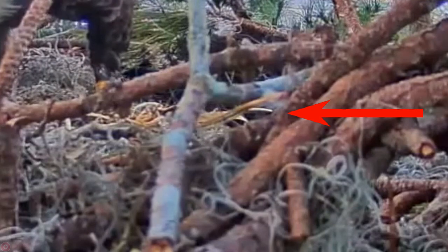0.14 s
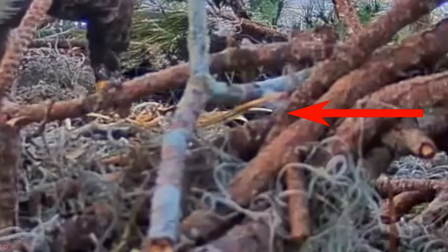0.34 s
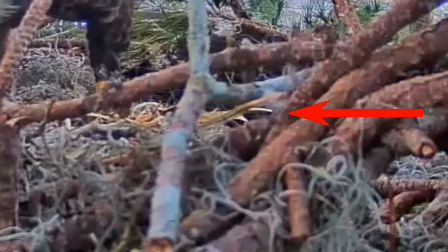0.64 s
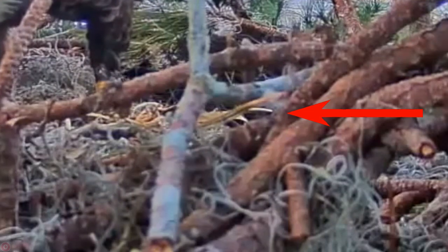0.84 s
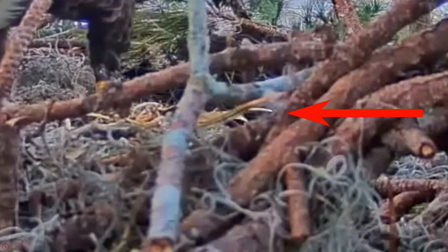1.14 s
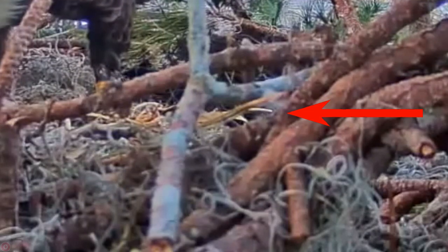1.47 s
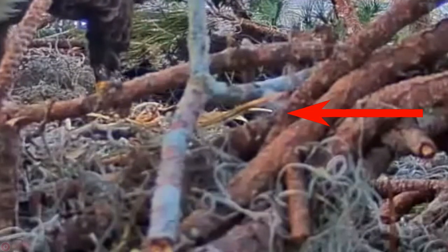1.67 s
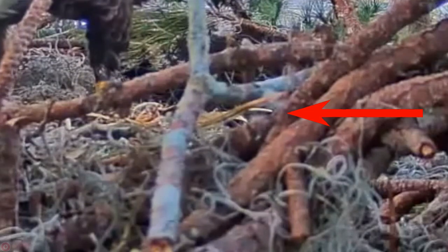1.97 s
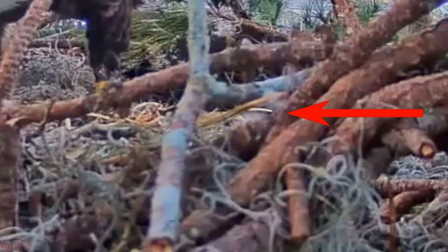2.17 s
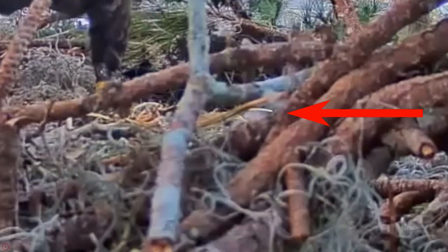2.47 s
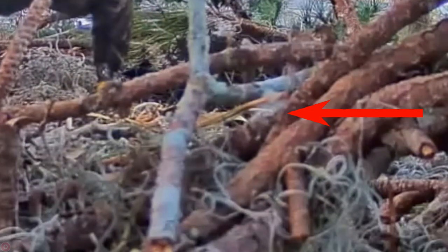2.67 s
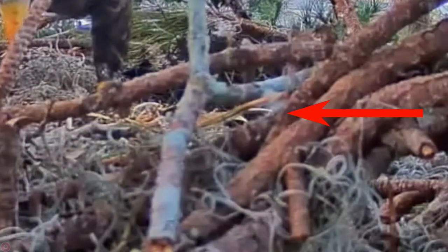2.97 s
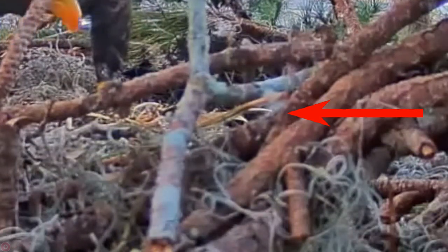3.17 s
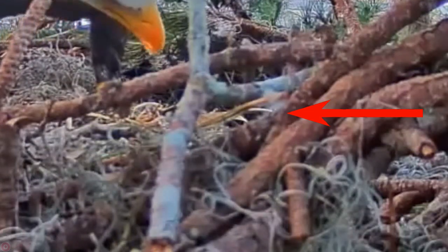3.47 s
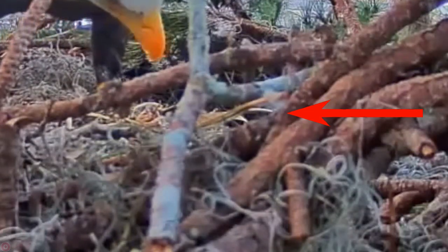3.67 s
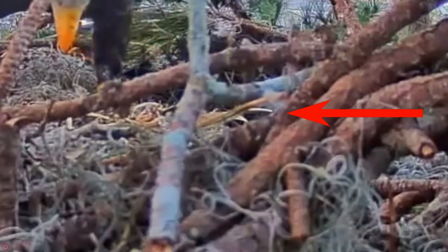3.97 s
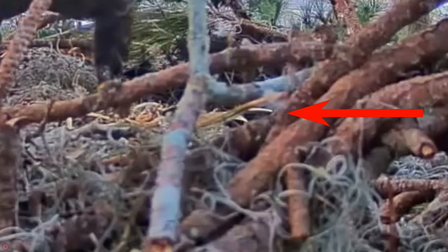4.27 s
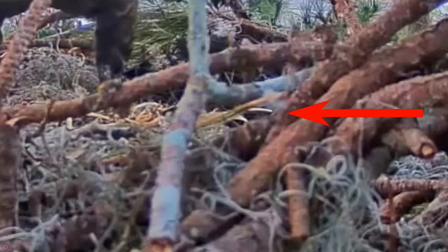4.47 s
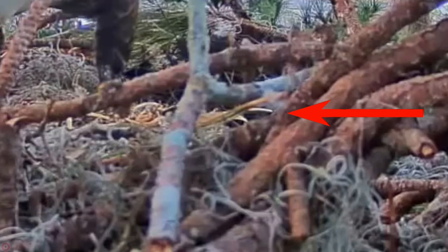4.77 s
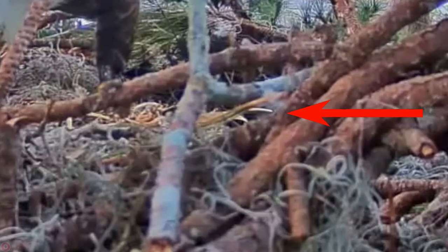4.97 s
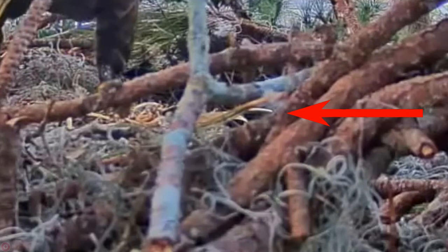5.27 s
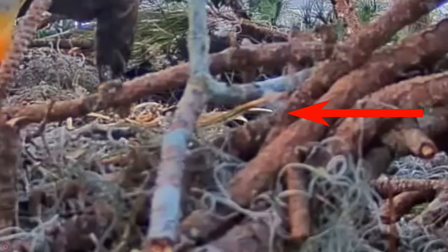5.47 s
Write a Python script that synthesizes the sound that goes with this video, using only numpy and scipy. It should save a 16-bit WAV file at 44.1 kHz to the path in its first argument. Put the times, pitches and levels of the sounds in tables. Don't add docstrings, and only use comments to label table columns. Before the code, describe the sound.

A close, dry outdoor scene at a stick nest, heard by a small stereo microphone without wind protection. Irregular low thumps and dull flutters of wind hit it from the start, over quiet distant air and a very faint low hum. Small twig ticks come near 0.9 s. At about 1.1 s a chick gives a clear, thin peep, rising for a quarter second and then dropping, among heavier wind bumps. Around 2.2-2.4 s birds shift: a cluster of sharp dry twig snaps, the strongest near 2.3 s, with brushing and crackling grass. Wind keeps bumping until about 3.6 s; a tiny weak chirp slips through at 3.2 s. Then it grows calmer, with only occasional thumps and a light tick at 4.1 s. A brighter, upward-leaping peep comes at 4.2-4.6 s and a wavering one at 5.1-5.4 s, before the nest settles. Faint treble sounds slightly watery and compressed.

```python
import sys
import numpy as np
from scipy import signal
from scipy.fft import rfft, irfft
from scipy.io import wavfile
from scipy.ndimage import uniform_filter1d

SR = 44100
rng = np.random.default_rng(int(sys.argv[2]) if len(sys.argv) > 2 else 0)


def output_pcm(signal):
    pcm = np.clip(np.atleast_2d(signal).T, -1, 1) * 32767
    wavfile.write(sys.argv[1], SR, np.round(pcm).astype(np.int16))


def nominal_scale(level):
    x = np.asarray(level, float) / 20
    return 10 ** x


N = 247842

# [t/s, f/Hz, level/dB]
PEEPS = [
    [(1.068, 2842, -67.5), (1.105, 3140, -54.5), (1.155, 3255, -50.5), (1.21, 3380, -45.5),
     (1.292, 3502, -43), (1.326, 3750, -40.5), (1.34, 3632, -42), (1.385, 3474, -42.5),
     (1.418, 2995, -57.5)],
    [(3.162, 2425, -76), (3.178, 2543, -65), (3.196, 2806, -62.5), (3.21, 2945, -59.5),
     (3.228, 2815, -60.5), (3.241, 2514, -60.5), (3.254, 2370, -77.5)],
    [(4.244, 2696, -57), (4.375, 3443, -46), (4.432, 3563, -47.5), (4.452, 3897, -53.5),
     (4.474, 3930, -50.5), (4.487, 3690, -48.5), (4.522, 4353, -45.5), (4.552, 3910, -43.5),
     (4.578, 3006, -59)],
    [(5.08, 2990, -58.5), (5.155, 3483, -44), (5.197, 3325, -45.5), (5.237, 3940, -43),
     (5.287, 3420, -42.5), (5.328, 4160, -49.5), (5.362, 3396, -44.5), (5.394, 3387, -45.5),
     (5.42, 2900, -62)],
]
# [f/Hz, level/dB]
THROAT = [(4900, -11), (5700, 1.5), (7000, -4), (7900, 3), (8700, 9), (9600, -11), (10600, -13.5),
          (12200, -29.5)]
# [delay/s, level/dB]
NEST_ECHOES = [(.0021, -22), (.0047, -22), (.011, -25), (.019, -30)]
# [t/s, peak level/dB, swing f/Hz, length/s]
EDDIES = [(.066, -30, 140, 0.014), (.167, -16.5, 146, 0.0034), (.429, -27, 68, 0.014),
          (.537, -28.5, 60.4, 0.0048), (.873, -31.5, 94, 0.007), (1.174, -30.5, 58, 0.042),
          (1.239, -18, 106.7, 0.027), (1.348, -19.5, 56, 0.017), (1.367, -22, 75, 0.051),
          (1.411, -22.5, 68, 0.011), (1.818, -25, 81.3, 0.013), (1.917, -27.5, 44.7, 0.03),
          (2.238, -21, 81, 0.011), (2.335, -19.5, 95, 0.0085), (2.418, -23.5, 60.7, 0.019),
          (2.442, -21, 56, 0.019), (2.609, -26, 83.2, 0.011), (2.65, -19.5, 78.6, 0.017),
          (2.757, -29, 72.5, 0.014), (2.938, -21.5, 127.5, 0.0056), (2.992, -27.5, 50, 0.0053),
          (3.067, -18, 81.5, 0.012), (3.088, -24, 119.6, 0.007), (3.321, -26, 62.3, 0.036),
          (3.452, -20, 99.8, 0.014), (3.509, -26.5, 101.6, 0.0015), (3.535, -17, 65, 0.013),
          (4.19, -30.5, 112.4, 0.012), (4.795, -19.5, 107.4, 0.0048), (5.125, -22.5, 63.8, 0.011)]
# [t/s, peak level/dB]
MORE_EDDIES = [(0.047, -27.5), (0.092, -35), (0.208, -32), (0.349, -27.5), (.381, -31.5), (0.677, -34.5),
               (0.759, -43), (1.052, -39.5), (1.203, -34.5), (1.144, -38.5), (1.269, -27), (1.471, -28.5),
               (1.744, -36), (1.894, -28.5), (1.963, -32.5), (2.479, -37), (2.695, -28.5), (2.768, -30),
               (2.844, -30), (2.886, -26.5), (3.024, -33.5), (3.119, -31.5), (3.185, -31), (3.418, -30),
               (3.579, -36), (3.617, -40), (3.994, -36), (4.038, -35.5), (4.366, -36.5), (4.863, -43.5),
               (5.155, -39), (5.402, -43)]
# [t/s, level/dB]
GUST = [(0, -62.5), (.59, -63), (.81, -59), (1.09, -66), (1.3, -45), (1.49, -64.5), (1.6, -72.5),
        (1.86, -65.5), (2, -91), (2.21, -57), (2.35, -35), (2.47, -75), (2.79, -47), (2.96, -65.5),
        (3.46, -67), (3.76, -56.5), (5.24, -63.5), (5.62, -70)]
# [f/Hz, level/dB per Hz]
BUFFET = [(12, -32.5), (20, 9.5), (105, -11.5), (167, -17.5), (227, -24), (275, -23.5), (333, -23),
          (572, -44), (654, -37.5), (2000, -66.5), (2600, -101), (4400, -120)]
# [t/s, peak level/dB, length/s]
RATTLES = [(0.064, -52, 0.018), (0.092, -54.5, 0.011), (0.161, -54, 0.0093), (0.162, -45, 0.0068),
           (0.204, -63.5, 0.022), (0.35, -61, 0.024), (0.381, -60, 0.017), (0.404, -64, 0.009),
           (0.427, -58, 0.014), (0.501, -53.5, 0.017), (0.531, -51, 0.0071), (0.66, -60.5, 0.0088),
           (0.854, -53.5, 0.028), (1.14, -67, 0.016), (1.162, -49.5, 0.0058), (1.225, -40.5, 0.0074),
           (1.24, -43.5, 0.02), (1.324, -44.5, 0.01), (1.33, -60, 0.01), (1.378, -48, 0.011),
           (1.465, -68, 0.0088), (1.639, -65.5, 0.0079), (1.727, -63.5, 0.013), (1.82, -56.5, 0.017),
           (1.887, -61, 0.012), (2.2425, -51, 0.011), (2.271, -48.5, 0.015), (2.332, -49, 0.0085),
           (2.378, -44.5, 0.0088), (2.413, -42, 0.027), (2.47, -56.5, 0.01), (2.602, -49, 0.015),
           (2.646, -49.5, 0.01), (2.69, -57.5, 0.0099), (2.726, -50.5, 0.012), (2.754, -51, 0.0098),
           (2.83, -57, 0.012), (2.856, -56, 0.014), (2.878, -58, 0.011), (2.936, -47, 0.0082),
           (2.978, -60.5, 0.013), (3.014, -51.5, 0.011), (3.058, -33, 0.0087), (3.124, -56, 0.015),
           (3.303, -53.5, 0.017), (3.405, -58, 0.012), (3.44, -49.5, 0.012), (3.501, -55.5, 0.016),
           (3.53, -50.5, 0.013), (3.586, -65, 0.0087), (4.026, -68.5, 0.017), (4.169, -55, 0.0082),
           (4.784, -57.5, 0.015), (5.126, -54, 0.0081), (5.139, -58.5, 0.0033), (5.239, -59.5, 0.033)]
# [f/Hz, level/dB per Hz]
RATTLE_SPECTRUM = [(150, -32), (260, -1), (340, -0.5), (500, -13.5), (700, -14.5), (1000, -25.5),
                   (1150, -42), (1700, -49)]
# [t/s, peak level/dB, low band level/dB relative, top octave level/dB relative]
SNAPS = [(0.926, -42.5, -17, -32), (0.931, -54.5, -4, -28), (1.092, -62, 3, -18), (1.155, -42, -16, -18),
         (1.539, -77, -3, -12), (1.569, -66, -16, -16), (1.633, -54.5, -0.5, -29), (1.643, -45, -8, -10),
         (2.026, -57, -11, -25), (2.195, -43, -18, -10.5), (2.1997, -41, -23, -24),
         (2.2161, -47.5, -20.5, 1), (2.24, -43, -21, -8), (2.26, -40, -20.5, -12.5),
         (2.278, -38, -30, -6.5), (2.2831, -25, -22.5, -10), (2.2848, -35, -14, -2), (2.2864, -36, -1, -15),
         (2.3, -48.5, -4, -5.5), (2.3153, -49, -7, -26), (2.3178, -49.5, -6, -29.5),
         (2.331, -57.5, -0.5, -20), (2.372, -56.5, -43, -34), (2.202, -55, -12, -21),
         (2.4055, -46.5, -26.5, -24), (3.168, -71, -12, -36), (4.075, -47, -43, 0), (4.994, -74, -1.5, -4),
         (5.093, -65, 2.5, -12), (5.24, -60.5, -36, -8), (5.554, -66.5, -18.5, -8)]
# [f/Hz, width/Hz, level/dB]
TWIG_LOW = [(1500, 590, -26.5), (2410, 1000, 4.5), (3670, 190, -2.5)]
# [f/Hz, width/Hz, level/dB]
TWIG_HIGH = [(6240, 1300, -6.5), (9040, 1400, 9), (11650, 2900, 3.5), (14500, 790, 1.5)]
# [middle t/s, length/s, f/Hz, width/Hz, level/dB]
BRUSHES = [(0.108, 0.042, 3760, 930, -82), (0.512, .033, 5940, 910, -78), (0.544, 0.016, 2190, 2000, -85),
           (0.56, 0.11, 7250, 206, -77.5), (.991, .015, 3800, 600, -79.5), (1.483, .026, 3100, 1840, -79.5),
           (1.59, .01, 3920, 700, -73), (1.634, 0.0036, 1274, 1785, -57), (1.644, 0.0063, 1180, 1550, -60),
           (2.237, 0.1, 13900, 2570, -74), (2.25, .07, 7000, 1800, -75), (2.25, .06, 4140, 1210, -76),
           (2.191, .005, 2200, 1200, -71), (2.23, 0.096, 9900, 2540, -70), (2.284, 0.028, 9640, 5060, -53),
           (2.289, .05, 14500, 2610, -65), (2.376, 0.1, 8610, 1500, -69.5), (2.362, .055, 6910, 504, -72.5),
           (2.393, .02, 3240, 770, -77), (2.096, 0.023, 9550, 1970, -86.5), (2.675, .03, 8340, 594, -80.5),
           (2.876, 0.046, 5660, 296, -81.5), (3.043, 0.03, 11000, 900, -82),
           (3.17, .005, 5700, 1800, -68.5), (3.135, .07, 8640, 1823, -79), (3.155, 0.012, 3670, 784, -79.5),
           (3.24, .008, 5370, 710, -79.5), (3.255, .016, 2410, 650, -70), (3.469, 0.023, 8270, 2210, -66.5),
           (3.782, .024, 7560, 2510, -76), (3.839, 0.011, 3040, 1500, -76.5),
           (4.224, 0.039, 7780, 2350, -79.5), (4.248, 0.016, 3230, 1430, -73.5),
           (4.49, .06, 4470, 900, -72.5), (4.47, .022, 8400, 1100, -64.5), (4.526, 0.042, 5000, 910, -76.5),
           (5.161, .04, 1860, 398, -79), (5.45, .02, 6600, 3440, -79), (5.006, 0.035, 9900, 2930, -78.5),
           (5.119, 0.0053, 9540, 1580, -61)]
# [middle t/s, length/s, level/dB]
BLIPS = [(0.429, .05, -88), (.54, 0.035, -82), (1.405, 0.063, -81), (2.436, 0.055, -82),
         (3.318, 0.033, -84.5), (3.818, .05, -85), (3.984, 0.026, -92)]
# [t/s, peak level/dB, rise/s, fall/s]
STIRS = [(0.101, -87.5, 0.34, 0.074), (0.548, -77, 0.026, 0.023), (0.952, -97.5, 0.96, 0.25),
         (1.6, -88.5, 0.1, 0.13), (1.868, -83, 0.033, 0.03), (2.205, -73, 0.11, 0.052),
         (2.29, -68, 0.014, 0.03), (2.325, -79, 0.015, 0.015), (3.165, -88.5, 0.03, 0.085),
         (4.198, -85.5, 0.0076, 0.14), (4.95, -80.5, 0.028, 0.02), (5.005, -81.5, 0.021, 0.021),
         (5.08, -76, 0.019, 0.12), (5.44, -81, 0.014, 0.022)]
# [f/Hz, level/dB per Hz]
GRASS = [(710, -54), (1200, -30), (2150, -10), (4450, -11), (9010, -8), (9930, -14), (12500, -22),
         (13200, -40.5)]
PATCH_EDGES_HZ = [700, 2500, 4500, 7500, 16000]
# [f/Hz, level/dB per Hz]
AIR = [(15, -27.5), (25, -9.5), (77, -8.5), (152, -6), (278, -23), (578, -30), (1050, -38.5), (1230, -38.5),
       (4330, -42), (4940, -57), (10300, -49.5), (13000, -46.5)]
# [from t/s, left channel late by/samples]
SLIPS = [(0, 0), (.61, 7), (.8, 43), (.97, 198), (1.04, -82), (1.1, 0), (1.57, 15), (1.67, -8), (1.71, 8),
         (2.08, -7), (2.17, 22), (2.245, 37), (2.33, 0), (3.5, -5), (3.57, 117), (3.62, -125), (3.7, 74),
         (3.78, -161), (3.85, -117), (3.93, 60), (4.01, -36), (4.11, 0), (4.63, -7), (4.7, 0)]
# [from t/s, to t/s]
DROPOUTS = [(.05, .12), (.16, .23), (.33, .46), (.62, .7), (.86, .9), (1.89, 1.99), (2.34, 2.49),
            (2.58, 2.96), (3, 3.09), (3.29, 3.35), (3.42, 3.45), (3.51, 3.65), (3.98, 4.01)]


def rms_one(x):
    return x / np.sqrt(np.mean(x ** 2) + 1e-20)


def butter(x, order, hz, kind="low"):
    return signal.sosfilt(signal.butter(order, hz, kind, fs=SR, output="sos"), x)


def in_time(rows):
    s, *columns = np.transpose(rows)
    return [np.interp(np.arange(N) / SR, s, column) for column in columns]


def coloured(x, spectrum):
    hz = np.arange(1, N // 2 + 2) * SR / N
    point_hz, point_db = np.transpose(spectrum)
    gain = nominal_scale(np.interp(np.log(hz), np.log(point_hz), point_db))
    return rms_one(irfft(rfft(x) * gain, N))


def drift(rate):
    r = np.exp(-80 * np.pi * rate / SR)
    slow = signal.lfilter([1], [1, -2 * r, r * r], rng.standard_normal(N // 40 + 2002))[2000:]
    return np.interp(np.arange(N) / 40, np.arange(len(slow)), rms_one(slow))


def resonance(x, hz, width_hz):
    r = np.exp(-np.pi * width_hz / SR)
    poles = [1, -2 * r * np.cos(2 * np.pi * hz / SR), r * r]
    return signal.lfilter([(1 - r * r) / 2, 0, (r * r - 1) / 2], poles, x)


def chick(flutter_db, waver, roughness_db, fourth_db):
    attack_s, onset_s = 0.0093, 0.013
    second_own_db, third_own_db = -11, -17
    growth, full_effort_db = 0.14, -44
    warble_hz, warble = 22, 0.007
    catch_share, catch_s = 0.2, 0.005
    scoop_share, scoop_s = 0.13, 0.018
    sag_share, sag_s = 0.16, 0.00965
    fade_s, fade_db_per_s = 0.03, 762.5
    hoarse_when_soft = 0.296
    fourth_centre_hz = 15400

    t = np.arange(N) / SR
    voice, fourth = np.zeros(N), np.zeros(N)
    flutter = nominal_scale(flutter_db * drift(45))
    unsteady = 1 + waver * drift(60)
    roughness = nominal_scale(roughness_db) * hoarseness()
    tremble = np.sin(2 * np.pi * warble_hz * np.cumsum(1 + 0.3 * drift(4.6)) / SR)
    throat_hz, throat_db = np.transpose(THROAT)
    for rows in PEEPS:
        hz, db = in_time(rows)
        start, end = rows[0][0], rows[-1][0]
        since, after = np.maximum(t - start, 0), np.maximum(t - end, 0)
        fade_db = fade_db_per_s * after
        hz = hz * (1 - sag_share * (1 - np.exp(-after / sag_s))) * (1 + warble * tremble)
        hz, db = [uniform_filter1d(uniform_filter1d(c, size=480), size=340) for c in (hz, db - fade_db)]
        hz = hz * (1 + catch_share * np.exp(-since / catch_s) - scoop_share * np.exp(-since / scoop_s))
        over_db = db + growth * (db - full_effort_db) - fade_db
        over_db = over_db - 20 * np.exp(-(since / onset_s) ** 2)
        second_db = over_db + second_own_db + np.interp(np.log(2 * hz), np.log(throat_hz), throat_db)
        third_db = over_db + third_own_db + np.interp(np.log(3 * hz), np.log(throat_hz), throat_db)
        phase = 2 * np.pi * np.cumsum(hz * unsteady) / SR
        opening = np.clip(np.minimum((t - start) / attack_s, 2 * (1 - after / fade_s)), 0, 1)
        softness_db = np.clip(full_effort_db - db, 0, 20)
        edge = np.sqrt(2) * opening ** 2 * (flutter + roughness * nominal_scale(hoarse_when_soft * softness_db))
        for k, level_db in enumerate([db, second_db, third_db], 1):
            voice += edge * nominal_scale(level_db) * np.sin(k * phase)
        fourth += edge * nominal_scale(second_db + fourth_db) * np.sin(4 * phase)
    voice += resonance(resonance(fourth, fourth_centre_hz, 900), fourth_centre_hz, 900)
    return voice + sum(nominal_scale(db) * np.interp(t - lag, t, voice) for lag, db in NEST_ECHOES)


def hoarseness():
    air = rng.standard_normal(N)
    narrow = rms_one(butter(air, 3, 430))
    wide = rms_one(butter(air, 3, 1500))
    return rms_one((narrow + nominal_scale(-17) * wide) * nominal_scale(5 * drift(25)))


def wind(push_db, puff_db, spread, steep, sharp, lumpy_db):
    whirl_hz, whirl_s, whirl_spread = 74.5, 0.01, 0.39
    surge_hz, surge_s, surge_db = 45.7, 0.011, -14.5
    puff_lead_s = 0.0087

    push, puff = np.zeros(N), np.zeros(N)
    span = np.arange(-3000, 3000)
    t = span / SR
    sizes = np.exp(whirl_spread * rng.standard_normal(len(MORE_EDDIES)))
    whirls = [(s, db, whirl_hz / size, whirl_s * size) for (s, db), size in zip(MORE_EDDIES, sizes)]
    for s, db, hz, length in EDDIES + whirls:
        at = round(s * SR) + span
        inside = at >= 0
        bell = nominal_scale(db) * np.exp(-(t * np.where(t < 0, steep, 1) / (spread * length + 0.3 / hz)) ** 2)
        phase = 2 * np.pi * hz * t + 1.5 + rng.normal(0, 1.0)
        swing = bell * (np.cos(phase) + sharp * np.cos(2 * phase))
        steady = 2.5 * bell * swing.sum() / bell.sum()
        push[at[inside]] -= (swing - steady)[inside]
        puff[at[inside]] += bell[inside]
    turbulence = coloured(rng.standard_normal(N), BUFFET)
    gust = nominal_scale(in_time(GUST)[0] + lumpy_db * drift(11.0))
    fine = butter(turbulence, 2, 170, "high")
    heave = rms_one(butter(rng.standard_normal(N), 2, [0.34 * surge_hz, surge_hz], "band"))
    wake = signal.lfilter([1 / (0.59 * surge_s * SR)], [1, -np.exp(-1 / (surge_s * SR))], puff)
    early = np.interp(np.arange(N) + puff_lead_s * SR, np.arange(N), puff)
    puffs = nominal_scale(puff_db) * (early + 0.43 * wake) * fine
    return nominal_scale(push_db) * push + puffs + gust * turbulence + nominal_scale(surge_db) * wake * heave


def rattles(level_db, lumpy_db):
    rise_s = 0.0034
    t = np.arange(N) / SR
    swell = np.zeros(N)
    for s, db, length in RATTLES:
        part = slice(max(round(s * SR) - 400, 0), round(s * SR) + 4000)
        since = t[part] - s - rise_s
        swell[part] += nominal_scale(db) * np.exp(-(since / np.where(since < 0, rise_s, length)) ** 2)
    return nominal_scale(level_db + lumpy_db * drift(42)) * swell * coloured(rng.standard_normal(N), RATTLE_SPECTRUM)


def snaps(burst_s, tail_s, tail_db, low_db):
    rise_s = 0.0007
    top_hz = 12200
    out, t = np.zeros(N), np.arange(900) / SR
    shape = np.minimum(t / rise_s, 1) * (np.exp(-t / burst_s) + nominal_scale(tail_db) * np.exp(-t / tail_s))
    for s, db, rel_db, top_db in SNAPS:
        burst = rng.standard_normal(900) * shape
        low = sum(nominal_scale(g) * resonance(burst, hz, w) for hz, w, g in TWIG_LOW)
        high = sum(nominal_scale(g) * resonance(burst, hz, w) * (-1) ** k for k, (hz, w, g) in enumerate(TWIG_HIGH))
        high = butter(high, 6, top_hz) + nominal_scale(top_db) * butter(high, 6, top_hz, "high")
        body = nominal_scale(rel_db + low_db) * butter(low, 6, top_hz) / np.abs(low).max()
        at = round(s * SR)
        out[at:at + 900] += nominal_scale(db) * (high / np.abs(high).max() + body)
    return butter(out, 3, 1400, "high")


def brushes(grain_db):
    out, span = np.zeros(N), np.arange(-6000, 6000)
    t = span / SR
    grit = rng.standard_normal(N) * nominal_scale(grain_db * drift(400))
    blips = [(s, length, 1617, 130, db) for s, length, db in BLIPS]
    for s, length, hz, width_hz, db in BRUSHES + blips:
        at = np.clip(round(s * SR) + span, 0, N - 1)
        band = rms_one(butter(grit[at], 3, [hz - width_hz / 2, hz + width_hz / 2], "band"))
        out[at] += nominal_scale(db) * np.exp(-(2 * t / length) ** 2) * band
    return out


def grass(per_s, size_db, smooth, wide):
    born = rng.random((2, N)) < per_s * nominal_scale(5.0 * drift(25)) / SR
    sizes = nominal_scale(size_db * np.minimum(rng.exponential(1, (2, N)), 5))
    grains = born * sizes * rng.choice([-1, 1], (2, N))
    mid, side = [coloured(rms_one(g) + smooth * rng.standard_normal(N), GRASS) for g in grains]
    return stirring() * nominal_scale(4.1 * drift(24)) * patchy(mid + wide * side * np.array([[1], [-1]]))


def stirring():
    t = np.arange(N) / SR
    level = nominal_scale(-90)
    for s, db, rise, fall in STIRS:
        level = level + nominal_scale(db) * np.exp(-((t - s) / np.where(t < s, rise, fall)) ** 2)
    return level


def patchy(x):
    pairs = zip(PATCH_EDGES_HZ, PATCH_EDGES_HZ[1:])
    return sum(nominal_scale(2.2 * drift(5.3)) * butter(x, 2, pair, "band") for pair in pairs)


def background():
    hum_hz, hum_width_hz, hum_db, air_db = 141.4, 6.8, -73, -71
    air = nominal_scale(air_db + 0.18 * drift(1)) * coloured(rng.standard_normal(N), AIR)
    narrow = resonance(resonance(rng.standard_normal(N), hum_hz, hum_width_hz), hum_hz, hum_width_hz)
    tone = np.sin(2 * np.pi * hum_hz * np.cumsum(1 + 0.0087 * drift(6.1)) / SR)
    return air + nominal_scale(hum_db + 1.0 * drift(0.83)) * (tone + 1.6 * rms_one(narrow))


def scene():
    bird = chick(flutter_db=2.0, waver=0.0058, roughness_db=-19.5, fourth_db=-25.0)
    thumps = wind(push_db=-7.5, puff_db=-12.0, spread=0.29, steep=1.2, sharp=0.22, lumpy_db=5.0)
    thumps = thumps + rattles(level_db=-11.0, lumpy_db=3.5)
    twigs = snaps(burst_s=0.00051, tail_s=0.0058, tail_db=-21.0, low_db=5.0) + brushes(grain_db=5.0)
    rustle = grass(per_s=56000, size_db=11.5, smooth=0.99, wide=0.6)
    return bird + thumps + twigs + rustle + background()


def slip(left):
    starts, lags = np.transpose(SLIPS)
    turn = np.searchsorted(starts, np.arange(N) / SR, "right") - 1
    return sum(uniform_filter1d(1. * (turn == k), size=600) * np.roll(left, int(lag)) for k, lag in enumerate(lags))


def starve(x, step_db, slope, top_db, chance_db, treble_cost):
    dropout_db, dropout_hz, held_db = 11, 1700, 5
    hz, s, z = signal.stft(np.array([x[0] + x[1], x[0] - x[1]]) / 2, SR, "cosine", 2048)
    frames = z.shape[2]
    treble = (hz > dropout_hz)[:, None]
    cost = np.where(hz > 1500, treble_cost, 1)[:, None]
    loud_db = 10 * np.log10(np.sum(np.abs(z[0]) ** 2 * cost, axis=0) + 1e-12)
    chance = np.repeat(rng.standard_normal((2, 65, frames)), 16, axis=1)[:, :len(hz)]
    held = np.kron(rng.standard_normal((17, frames // 3 + 1)), np.ones((64, 3)))[:len(hz), :frames] * treble
    short = sum((s > start) & (s < end) for start, end in DROPOUTS) * treble
    coarse_db = step_db + dropout_db * short + slope * np.maximum(loud_db + 65.5, 0)
    step = nominal_scale(coarse_db + top_db * (hz > 12800)[:, None] + chance_db * chance + held_db * held)
    mid, side = signal.istft(step * np.round(z / step), SR, "cosine", 2048)[1][:, :N]
    return np.array([mid + side, mid - side])


def band_limit(x):
    return signal.sosfilt(signal.butter(12, 16360, fs=SR, output="sos"), x)


def record(dry):
    slipped = np.array([slip(dry[0]), dry[1]])
    stream = starve(slipped, step_db=-122, slope=1.0, top_db=14, chance_db=5, treble_cost=3)
    hissy = stream + nominal_scale(-97.2) * rng.standard_normal((2, N))
    mix = signal.sosfilt(signal.cheby2(12, 50, 16600, fs=SR, output="sos"), hissy)
    return band_limit(mix)


dry = scene()
out = record(dry)
output_pcm(out)
```